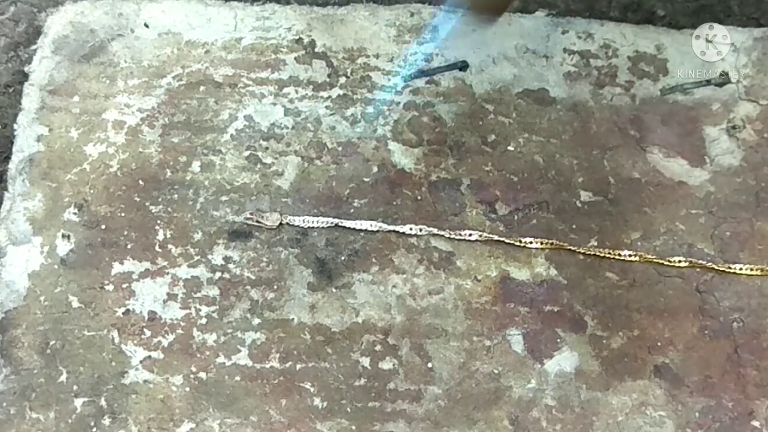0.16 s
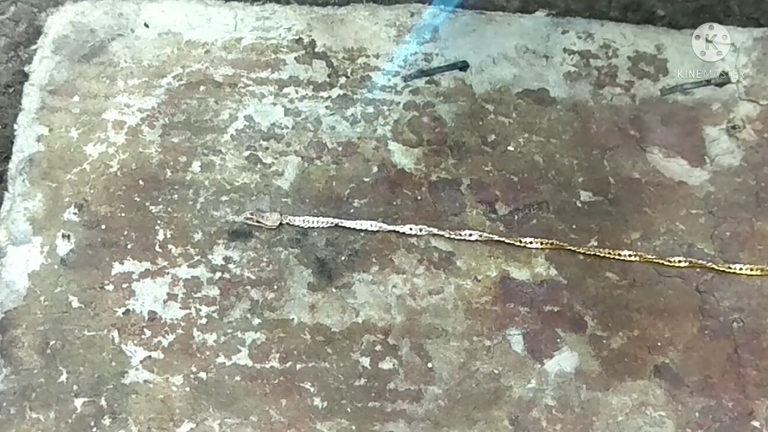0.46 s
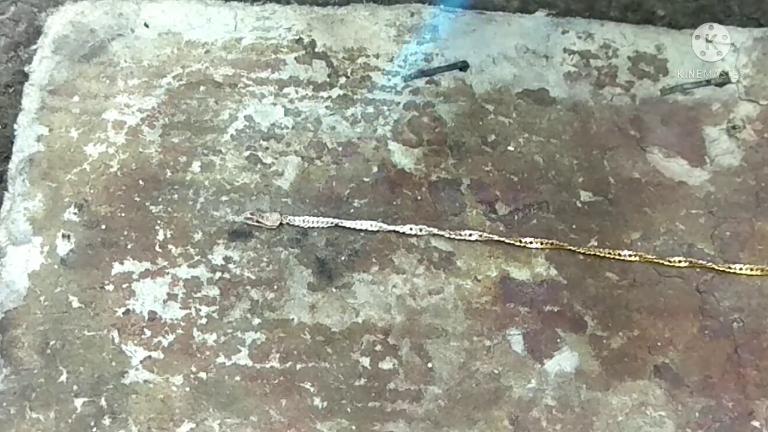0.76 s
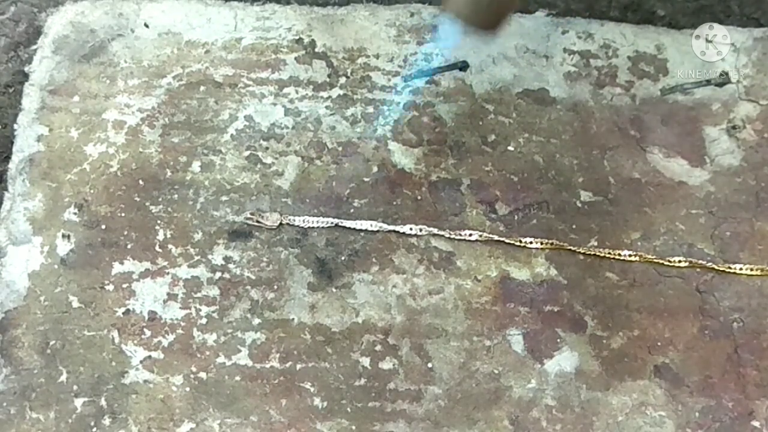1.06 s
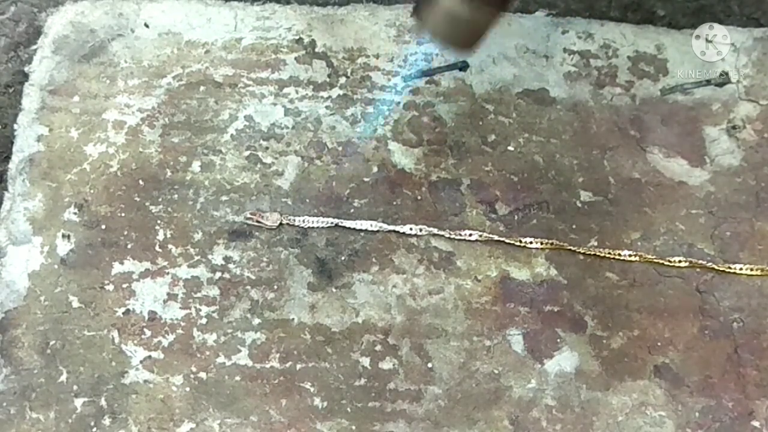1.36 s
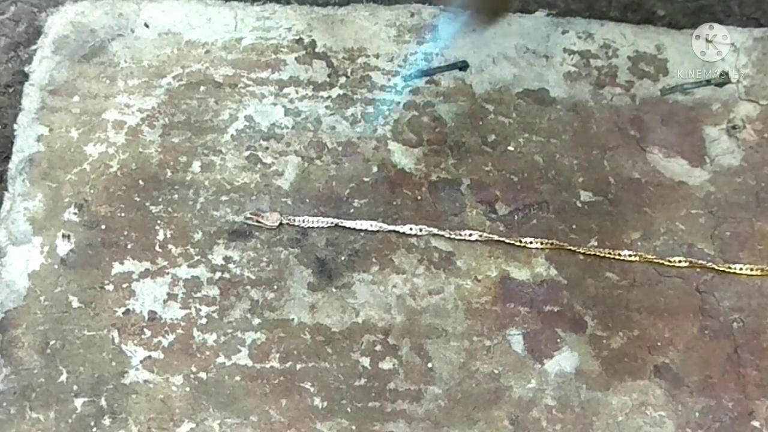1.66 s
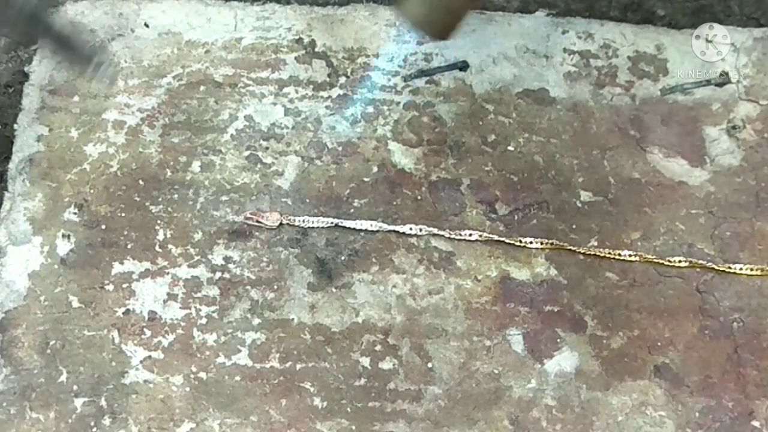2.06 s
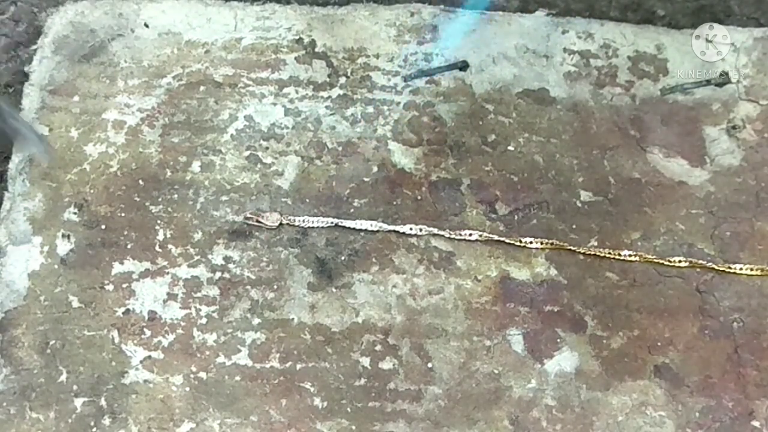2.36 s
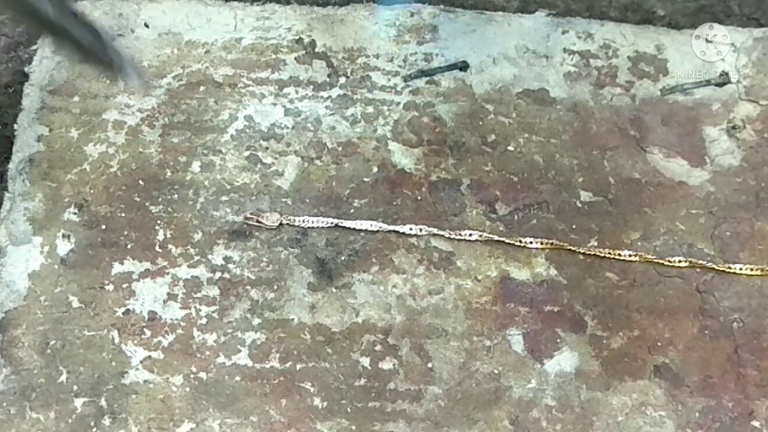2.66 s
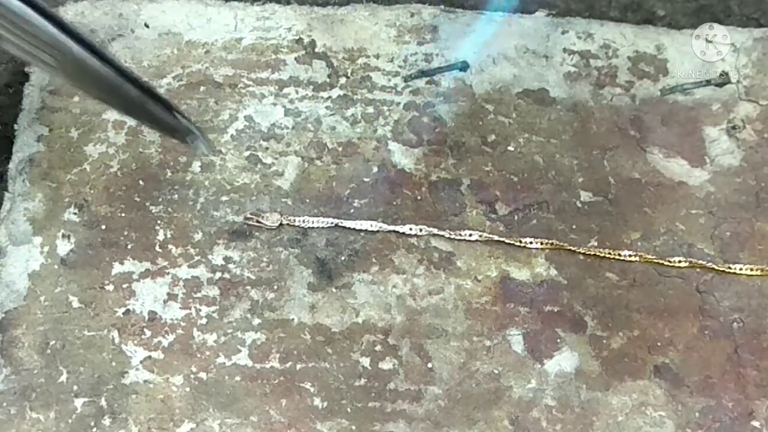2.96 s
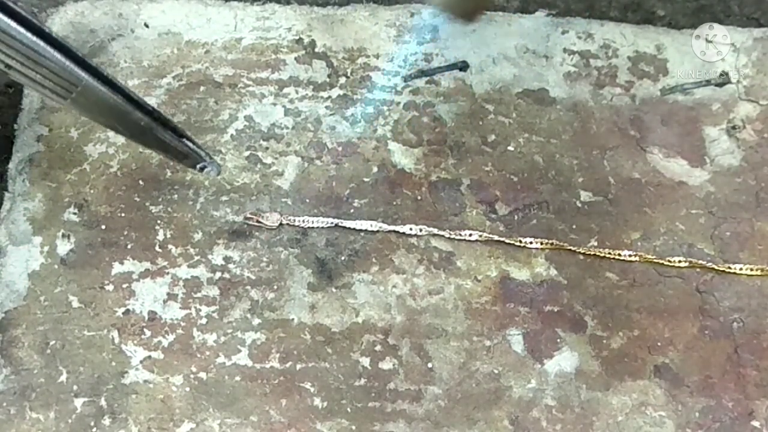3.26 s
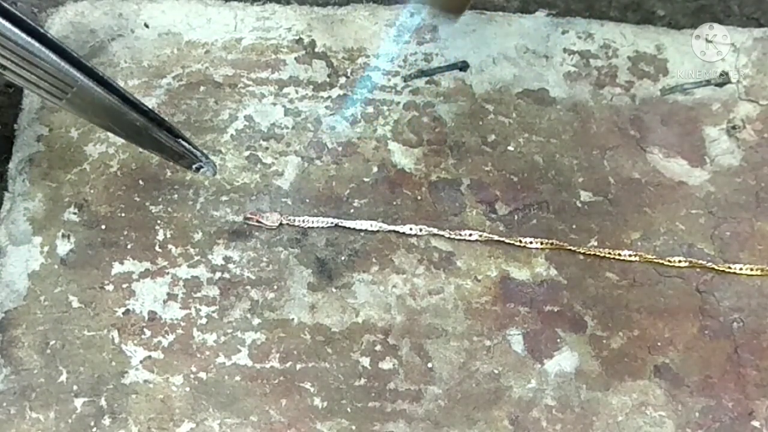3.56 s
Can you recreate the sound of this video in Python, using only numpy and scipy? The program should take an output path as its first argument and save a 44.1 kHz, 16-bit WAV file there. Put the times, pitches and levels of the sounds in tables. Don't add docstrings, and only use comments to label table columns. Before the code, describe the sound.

Close phone pickup of a torch jet hissing without pause, bright and slightly grainy, with a soft tube-like roar underneath fading briefly and swelling near the end; faint workshop air behind.

```python
import sys
import numpy as np
from scipy import signal
from scipy.fft import rfft, irfft
from scipy.io import wavfile
from scipy.ndimage import uniform_filter1d, map_coordinates

SR = 44100
rng = np.random.default_rng(int(sys.argv[2]) if len(sys.argv) > 2 else 0)


def put_to_file(sound):
    columns = np.atleast_2d(sound).T
    safe = np.clip(columns, -1, 1)
    whole_steps = np.round(safe * 32767)
    wavfile.write(sys.argv[1], SR, whole_steps.astype(np.int16))


def voltage_ratio(level):
    return 10 ** (np.asarray(level, float) / 20)


N = 163170
T = np.arange(N) / SR
HZ = np.fft.rfftfreq(N, 1 / SR)[1:]

# start_s, hum_level_db, jet_level_db, jet_pan_db (left minus right)
FLAME = [(0.0, -40, -32.5, 6), (0.26, -34.5, -31, 3), (0.31, -46, -33, 4), (0.48, -32.5, -33.5, 5),
         (0.58, -49, -31.5, 5), (0.7, -38.5, -32, 5.5), (1.39, -44, -33.5, 4), (1.53, -33.5, -32, 5.5),
         (1.95, -51.5, -33, 7), (2.0, -37, -32, 6.5), (2.83, -37, -33, 5.5), (3.03, -43.5, -32.5, 7.5),
         (3.072, -35.5, -33, 4), (3.452, -39.5, -31, 6.5), (3.55, -25.5, -32, 5), (3.7, -44, -34, 1.5)]


def level(x, db):
    return x * voltage_ratio(db) / np.sqrt(np.mean(x ** 2))


def on_log(table):
    hz, value = np.array(table, float).T
    return np.interp(np.log(HZ), np.log(hz), value)


def walk(rate_hz):
    hold = int(SR / rate_hz)
    held = np.repeat(rng.standard_normal(N // hold + 1), hold)
    return 1.035 * uniform_filter1d(uniform_filter1d(held, hold), hold)[:N]


def notch_gain():
    # pitch_hz, width_hz, left_depth_db, right_depth_db
    notches = [(3680, 200, -4, -4), (3950, 120, -4, -4), (4600, 250, -3, -3), (5520, 200, -5, -6),
               (6350, 200, -4, -4), (7050, 150, -4, -3), (7790, 250, -7, -7), (9070, 130, -10, -7),
               (12900, 500, -4, 0), (13500, 500, 0, -4)]
    db = 0
    for hz, width_hz, left_db, right_db in notches:
        db = db + np.outer([left_db, right_db], np.exp(-(2 * (HZ - hz) / width_hz) ** 2))
    return np.pad(voltage_ratio(db), ((0, 0), (1, 0)))


def hearing():
    # pitch_hz, share (0-1)
    alike = [(100, .96), (950, .95), (1300, .55), (2000, .9), (2600, .25), (3500, .42), (5500, .25),
             (8000, .45), (12000, .5)]
    # pitch_hz, lead_radians
    lead = [(100, 0.), (750, -.3), (1100, -1.5), (1500, -1.3), (2000, -3.1), (4300, -3.2), (6000, -6.2),
            (10000, -9.3)]
    shared = np.sqrt(np.clip(on_log(alike), 0, 1))
    turn = np.exp(0.5j * on_log(lead))
    return np.sqrt(shared) * np.array([turn, 1 / turn]), np.sqrt(1 - shared)


def ports(gain, how=None):
    shared, own = how or hearing()
    z = rng.standard_normal((3, 2 * len(HZ))).view(complex)
    spectrum = gain * (shared * z[0] + own * z[1:])
    return irfft(np.pad(spectrum, ((0, 0), (1, 0))), N)


def rung(rows, steepness, flicker_db, flicker_hz):
    how = hearing()
    modes = []
    for hz, width_hz, db, pan_db in rows:
        detuning = (HZ - hz * hz / HZ) / width_hz
        noise = ports(voltage_ratio(db) * (1 + detuning ** 2) ** -steepness, how)
        flicker = voltage_ratio(flicker_db * walk(flicker_hz))
        modes.append(noise * flicker * voltage_ratio(np.array([[pan_db], [-pan_db]]) / 2))
    return modes


def shop():
    # pitch_hz, density_db (per Hz)
    air = [(25, -25), (60, 5.5), (90, 9.5), (130, -6), (500, 0.5), (2000, -21.5), (7000, -7), (15000, -51)]
    return level(ports(voltage_ratio(on_log(air))), -54)


def bench(x):
    # delay_s, level_db
    echoes = [(.0031, -6.5), (.0047, -5.5), (.0073, -7), (0.0112, -9.5)]
    echo_sway_s, port_sway_s, echo_rate_hz = 1.1e-4, 4e-5, 6.5
    y = x
    for delay_s, db in echoes:
        path_s = delay_s + echo_sway_s * walk(echo_rate_hz)
        late = []
        for port in x:
            heard_at = (T - path_s - port_sway_s * walk(echo_rate_hz)) * SR
            late.append(map_coordinates(port, [heard_at], order=2, mode="mirror", prefilter=False))
        y = y + voltage_ratio(db) * np.array(late)
    return y * np.std(x) / np.std(y)


def roar():
    # pitch_hz, width_hz, level_db, pan_db (left minus right)
    tube = [(126.7, 28.7, -14.5, -2), (190, 80, -14, 0), (237, 27, -18, 14), (380.7, 48, -1, -7),
            (545.8, 59, -9, -0.5), (645, 70, -16, -11.5), (775, 127, -10.5, 0), (955, 250, -14.5, -2),
            (1278, 88, -14.5, 0), (1538, 130, -15.5, -3.5), (1773, 125, -13.5, 3), (2227, 610, -30, 0),
            (2442, 500, -20, -4), (3291, 900, -28.5, 6)]
    t, hum_db = np.array(FLAME).T[:2]
    modes = rung(tube, 0.88, 1.0, 4.8)
    strongest = int(np.argmax(np.array(tube)[:, 2]))
    hum_follow = 0.63
    swell_db = hum_follow * (np.interp(T, t, hum_db) - np.mean(hum_db))
    modes[strongest] = modes[strongest] * voltage_ratio(swell_db)
    return level(sum(modes), -36)


def jet():
    # pitch_hz, width_hz, level_db, pan_db (left minus right)
    nozzle = [(4281, 600, -19.5, -4.5), (5064, 450, -8.5, -3.5), (5820, 900, -19, -7.5),
              (7100, 1400, -18.5, 5.5), (8170, 360, -9, -4.5), (8734, 290, -6, -6), (9583, 680, -5, 5),
              (10360, 730, -3, 7.5), (10960, 610, -2, -4), (11600, 870, 0.5, 4.5), (12490, 600, -8, 7),
              (13860, 800, -8.5, 10.5), (14850, 880, -5.5, 5.5), (15430, 430, -13.5, -3)]
    sway_s, sway_rate_hz = 3e-5, 3.5
    t, _, db, pan_db = np.array(FLAME).T
    hiss = level(sum(rung(nozzle, 0.96, 1.7, 11.0)), 4.5)
    left, right = hiss * voltage_ratio(np.interp(T, t, db) + 0.68 * walk(17.0))
    heard_at = (T + sway_s * walk(sway_rate_hz)) * SR
    left = map_coordinates(left, [heard_at], order=4, mode="mirror")
    turn = voltage_ratio((np.interp(T, t, pan_db) - np.mean(pan_db)) / 2)
    return np.array([left * turn, right / turn])


def scene():
    torch = roar() + bench(jet() + shop())
    return irfft(rfft(torch) * notch_gain(), N)


def phone_grain(x, coarse_db, shift, size=1024):
    # pitch_hz, step_db
    coarseness = [(100, -45), (1400, -22), (2000, -7.5), (3100, -6.5), (4200, -5.5), (5000, -2.5),
                  (7800, -.5), (12000, -4.5), (15500, -3)]
    # time_s, thrift_db (added to the level under which a band is lost)
    thrift = [(0, -1), (.3, -1), (.42, 2.5), (.55, -1), (1.0, .5), (1.45, .5), (1.52, -4), (1.68, -4),
              (1.72, 1.5), (2.12, 1), (2.2, -1), (2.5, 3), (2.6, -4), (2.8, -3), (2.97, 2), (3.1, -1),
              (3.4, 0), (3.7, -3)]
    thrift_share, scatter_db, dead_zone = 0.35, 1.8, 0.4
    drop_db, weaker_db = -13.5, -1.5
    n, k = np.arange(2 * size), np.arange(size) + 0.5
    window = np.sin(np.pi * (n + 0.5) / (2 * size))
    basis = window[:, None] * np.cos(np.pi / size * np.outer(n + 0.5 + size / 2, k))
    turn = np.array([[1, 0.97], [1, -1]]) / np.sqrt(2)
    padding = ((0, 0), (size + shift, 2 * size - (N + shift) % size))
    halves = np.pad(turn @ x, padding, "reflect").reshape(2, -1, size)
    lines = np.concatenate([halves[:, :-1], halves[:, 1:]], axis=2) @ basis

    edges = np.r_[0:96:8, 96:144:12, 144:176:16, 176:216:20, 216:264:24, 264:320:28, 320:size:32]
    wide = np.diff(np.r_[edges, size])
    centre_hz = (edges + wide / 2) * SR / 2 / size
    hz, db = np.array(coarseness, float).T
    frame_s = (np.arange(lines.shape[1]) * size - shift) / SR
    thrift_db = np.interp(frame_s, *np.array(thrift).T)[:, None]
    step_db = np.interp(np.log(centre_hz), np.log(hz), db) + coarse_db + thrift_share * thrift_db
    step_db = step_db + scatter_db * rng.standard_normal((lines.shape[1], len(edges)))
    step = np.std(lines) * voltage_ratio(step_db)

    rms = np.sqrt(np.add.reduceat(lines ** 2, edges, axis=2) / wide)
    keep = (rms > step * voltage_ratio(drop_db + thrift_db)) | (rms > rms[::-1] * voltage_ratio(weaker_db))
    step, keep = np.repeat(step, wide, axis=1), np.repeat(keep, wide, axis=2)
    rounded = keep * np.sign(lines) * step * np.floor(np.abs(lines) / step + dead_zone)
    frames = rounded @ basis.T * 2 / size
    joined = frames[:, 1:, :size] + frames[:, :-1, size:]
    return turn @ joined.reshape(2, -1)[:, shift:shift + N]


def roll_off(x):
    return signal.sosfilt(signal.butter(12, 16650, fs=SR, output="sos"), x)


def record(dry):
    mix = signal.sosfilt(signal.butter(4, 101, "high", fs=SR, output="sos"), dry)
    rumble = ports(1 / (1 + (HZ / 120) ** 4))
    mix = mix + level(rumble, -75.5)
    mix = signal.sosfilt(signal.ellip(10, 0.2, 70, 15560, fs=SR, output="sos"), mix)
    mix = phone_grain(mix, -2.5, shift=590)
    mix = phone_grain(mix, 0, shift=109)
    return roll_off(mix)


dry = scene()
out = record(dry)
put_to_file(out)
```